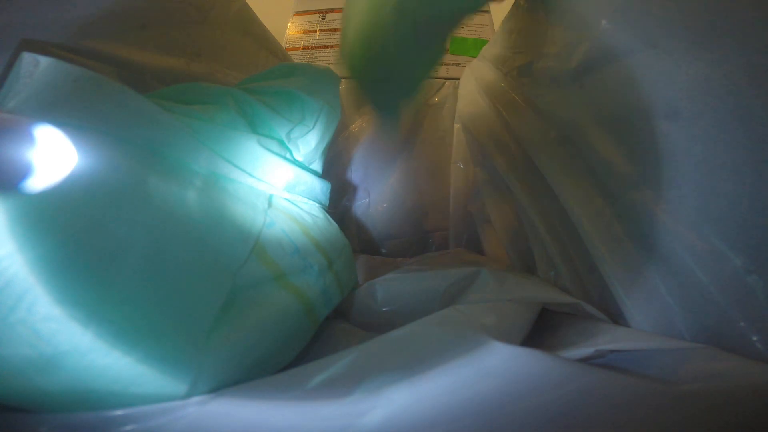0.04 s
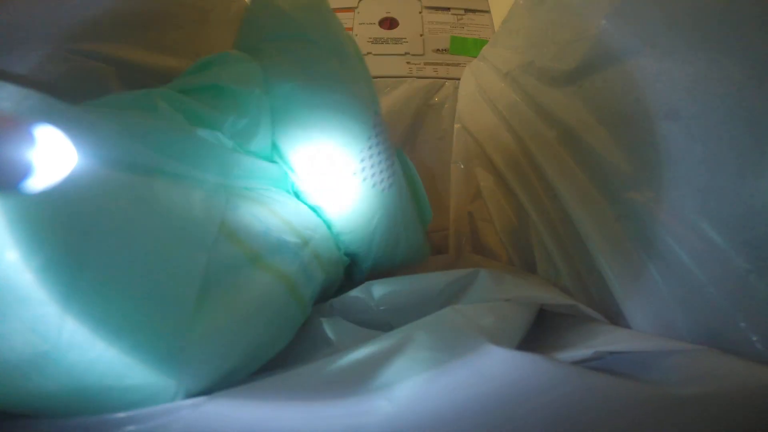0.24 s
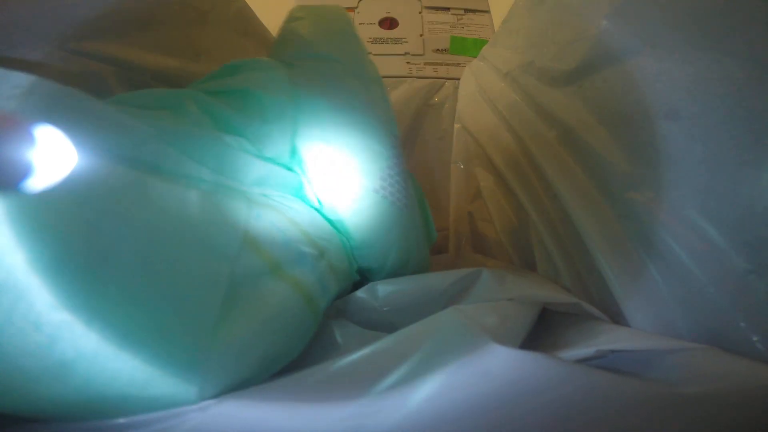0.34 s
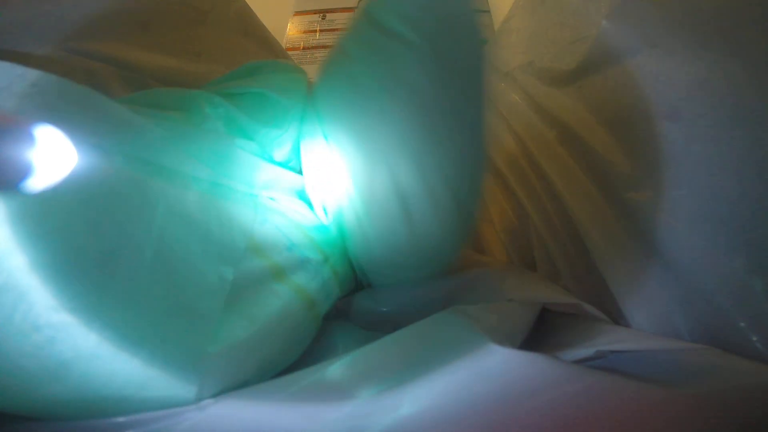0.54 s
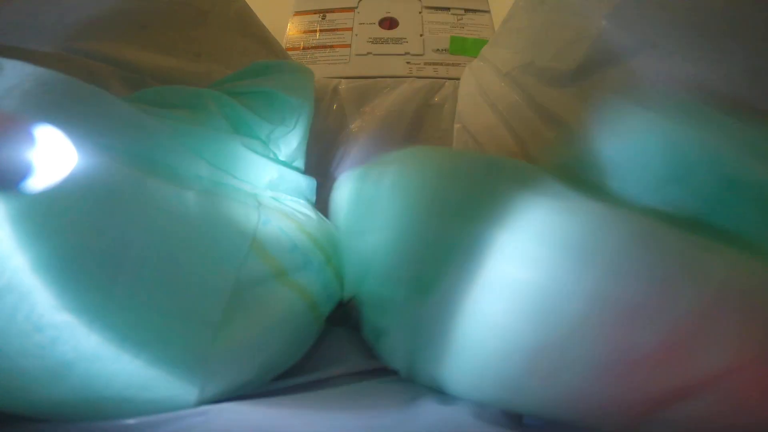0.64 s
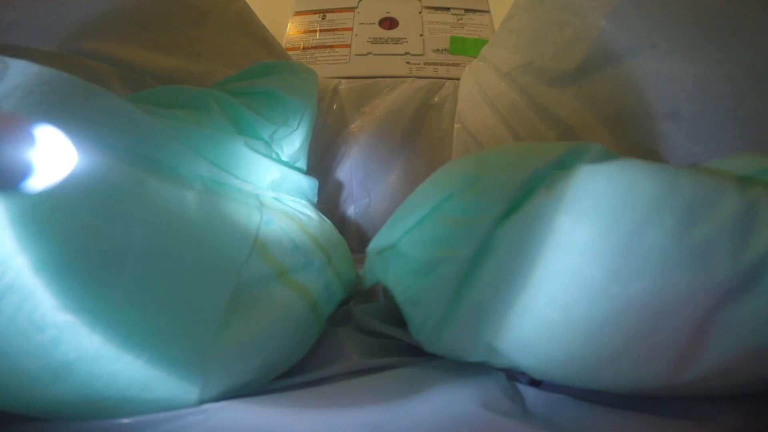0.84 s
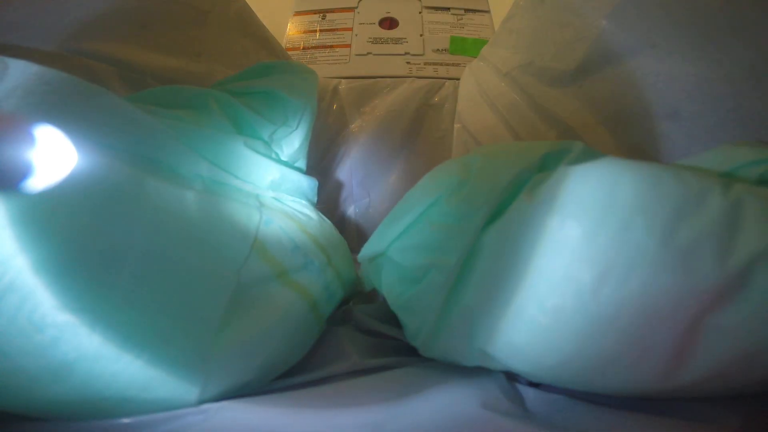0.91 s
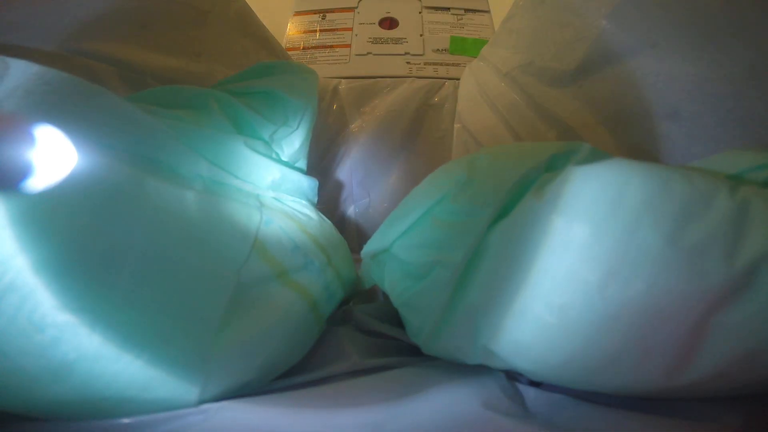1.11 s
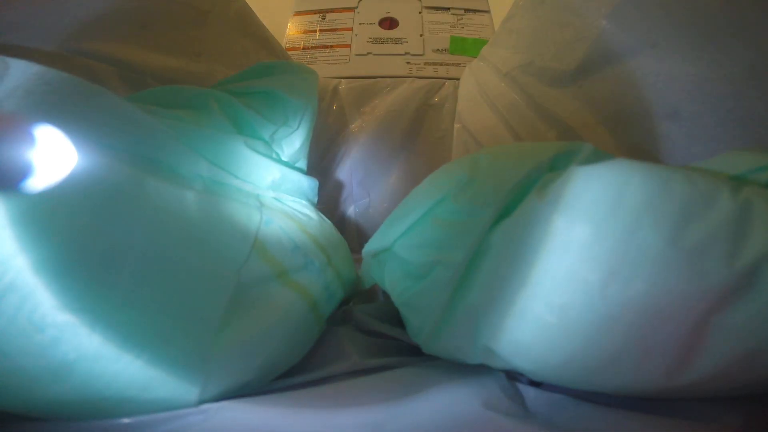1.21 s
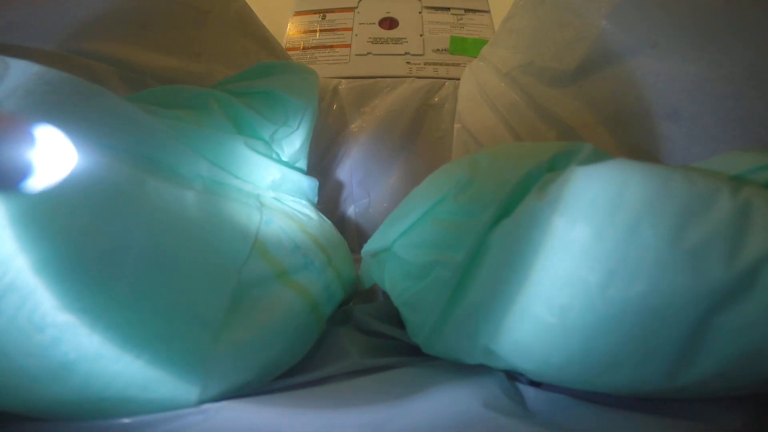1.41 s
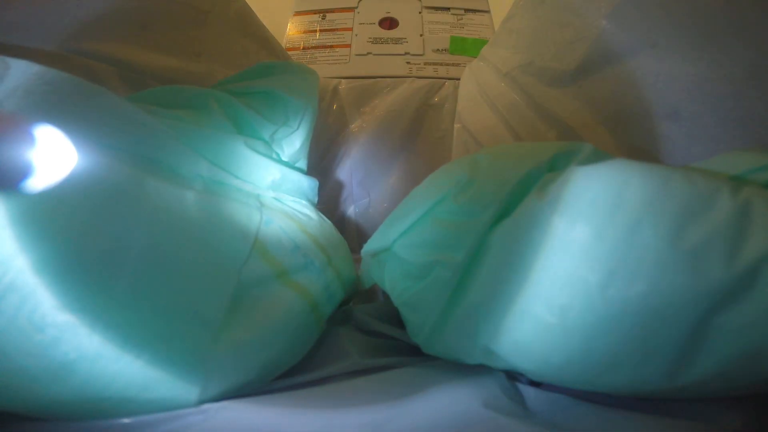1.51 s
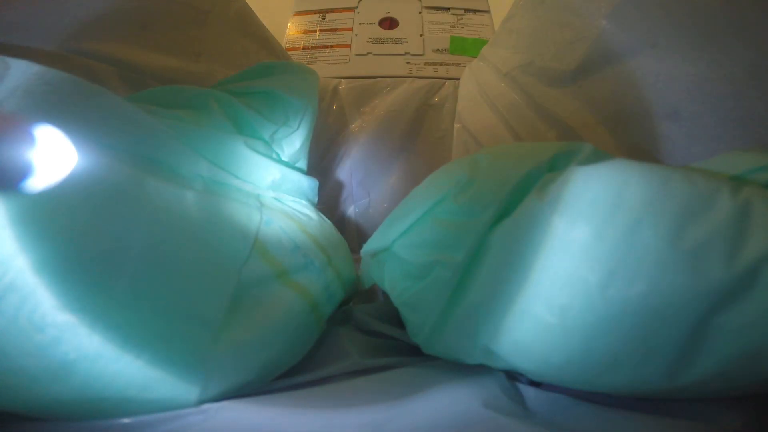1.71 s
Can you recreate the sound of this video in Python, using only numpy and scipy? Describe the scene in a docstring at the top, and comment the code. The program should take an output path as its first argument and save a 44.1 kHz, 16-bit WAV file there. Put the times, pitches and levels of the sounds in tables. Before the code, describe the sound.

A soft bundle thumps into a plastic-lined bin, heard from inside. After a faint brush of plastic, it lands at about 0.25 seconds with a deep, hollow boom and a crinkle, knocking again at 0.35. Smaller bumps follow as the boom fades. From 0.7 to 0.9 seconds it rubs quietly down the wall, rustling the liner. A faint low hum and hiss linger until about 1.75 seconds.

```python
"""First a faint brush of plastic, then a thump: a soft, tightly wrapped bundle drops into a lined bin,
heard from inside. It lands, tips over, rubs down the wall and settles. Each knock booms in the bin's
low modes, rings its hollow wall and crushes the liner, whose tiny buckles make the crinkle.
The bin wobbles under the load. A faint low hum lingers under the hiss."""
import sys
import numpy as np
from scipy import signal
from scipy.fft import rfft, irfft
from scipy.io import wavfile

SR = 44100
rng = np.random.default_rng(int(sys.argv[2]) if len(sys.argv) > 2 else 0)


def transcribe(u):
    """Save the signal u as a 16-bit wav file named by the first command-line argument.

    u: samples, shape (n,) or (channels, n), limited to [-1, 1]; the rate is SR.
    q: integer samples, one column per channel.
    """
    v = np.clip(np.atleast_2d(u).T, -1, 1)
    q = np.round(v * 32767).astype(np.int16)
    wavfile.write(sys.argv[1], SR, q)


N = 77175
T = np.arange(N) / SR

# partials of the low hum, before its swell: f/Hz, level/dB
HUM_PARTIALS = [(75.3, -44.5), (166.5, -44), (263, -60)]
# swell of the hum: t/s, gain/dB
HUM_ENVELOPE = [(0, -22), (.6, 5), (1.0, 3), (1.25, -3), (1.55, -6.5), (1.75, -11)]
# thin whine of electronics: f/Hz, level/dB
WHINE_PARTIALS = [(8781, -76.5), (11718, -82), (14625, -83.5)]
# tone of the air: f/Hz, gain/dB
AIR_EQ = [(25, 3), (70, 0), (140, -0.5), (200, -11), (280, -9.5), (420, -15), (900, -18.5), (2500, -32),
          (4500, -30.5), (5500, -34.5), (5900, -25), (6400, -36.5), (8000, -37), (15000, -43.5)]

# the falling bundle drags the liner: t/s, level/dB
BRUSH_ENVELOPE = [(.025, -74), (.043, -52), (.07, -54), (.15, -81.5), (.206, -70), (.211, -34),
                  (.217, -25.5), (.228, -33.5), (.245, -32.5), (.258, -34), (.28, -54.5), (.31, -65)]
# tone of that drag: f/Hz, gain/dB
BRUSH_EQ = [(300, 3.5), (900, -3.5), (1900, 5), (3900, -3), (4600, -10), (6300, -13), (9000, -23),
            (15000, -44.5)]
# the liner rustles as the bundle settles: t/s, level/dB
SETTLE_ENVELOPE = [(.33, -63), (.38, -62), (.48, -70), (.59, -63), (.65, -53), (.69, -57.5), (.742, -45.5),
                   (.785, -55.5), (.81, -53.5), (.855, -54), (.91, -69.5), (1.45, -71), (1.62, -61.5),
                   (1.75, -69)]
# tone of that rustle: f/Hz, gain/dB
SETTLE_EQ = [(400, 4.5), (700, 2.5), (1100, 0), (1800, 4.5), (3000, 0.5), (5000, -10), (6500, -7.5),
             (8000, -24), (15000, -38.5)]
# single creases snap: t/s, level/dB
SNAP_CUES = [(0.0508, -46.5), (0.1226, -42), (0.2141, -30.5), (0.247, -28.5), (0.338, -31.5),
             (0.375, -52.5), (0.427, -47.5), (0.517, -50), (0.651, -52), (0.683, -46), (0.711, -42),
             (0.7366, -33), (0.746, -51), (0.806, -46.5), (0.82, -50)]
# tone of the snaps: f/Hz, gain/dB
SNAP_EQ = [(500, -10.5), (1800, 2.5), (3000, 8), (4800, -2), (6500, -1), (8000, -12.5), (10000, -11),
           (15000, -27)]

# the bundle rubs along the wall: t/s, level/dB
RUB_ENVELOPE = [(.5, -66), (.63, -60.5), (.70, -48), (.75, -41.5), (.80, -53.5), (.885, -46.5),
                (.94, -66.5), (1.1, -69.5)]
# hollow bands the rub stirs: f/Hz, width/Hz, gain/dB
RUB_BANDS = [(254, 37, -1), (427, 43, -3.5), (516, 56, -5.5), (770, 100, -12)]
# the bin wobbles on its base: t/s, level/dB
WOBBLE_ENVELOPE = [(0, -62), (.10, -37), (.20, -50), (.228, -23.5), (.25, -6.5), (.31, -12), (.35, -19),
                   (.45, -22.5), (.50, -18), (.60, -28), (.76, -31), (.84, -32), (.90, -28.5), (1.0, -30.5),
                   (1.055, -43), (1.5, -46), (1.75, -78)]

# the bundle knocks the bin: t/s, boom/dB, slap/dB, slap t60/s, contact low-pass/Hz, wall ring/dB
KNOCK_CUES = [(.048, -39, -50.5, 0.031, 3000, -40.5), (0.1273, -47, -43, 0.026, 2800, -36),
              (0.2151, -24, -28.5, 0.18, 4000, -26), (0.249, -10.5, -14, 0.02, 2850, -0.5),
              (0.2541, -17.5, -17, 0.054, 2170, -11.5), (0.3226, -34, -25, 0.05, 2300, -14),
              (0.3404, -11, -20, 0.045, 2205, -7.5), (0.3451, -21.5, -25.5, 0.058, 1700, -15),
              (0.3532, -31.5, -36, 0.068, 2000, -17), (0.3785, -25.5, -36.5, 0.084, 2330, -26.5),
              (.430, -26.5, -36, 0.1, 2200, -29), (0.4689, -35, -47, .05, 1100, -34),
              (.7366, -45, -55, 0.046, 1900, -40.5), (.809, -37.5, -51.5, 0.065, 2800, -39)]
# tone of the crushed film: f/Hz, gain/dB
SLAP_EQ = [(150, -2), (400, 4.5), (900, 3.5), (1700, 1), (2700, -1), (4000, -15), (7000, -21.5),
           (15000, -25)]
# short, hollow modes of the wall: f/Hz, gain/dB, t60/s
WALL_MODES = [(682, -19, 0.13), (779, -15, 0.083), (996.5, -14.5, 0.06), (1123, -27, 0.075),
              (1273, -19, 0.046), (1502, -18.5, 0.064), (1740, -23.5, 0.051), (2175, -31.5, 0.054),
              (2412, -14.5, 0.049), (2624, -23, 0.04), (3340, -33.5, .042), (4093, -24.5, 0.037)]
# low modes of the bin: f/Hz, gain/dB, t60/s
BOOM_MODES = [(106.9, -11.5, 1.61), (134, -4.5, 1.27), (144.27, -3, 0.67), (173.92, -2.5, 0.98),
              (236.2, -15, .37), (261.3, -19, 1.09), (274.8, -1.5, 0.2), (319, -12, 0.26),
              (424.6, -7, 0.12), (454.6, -17.5, 0.41), (520, -11, 0.37), (559, -25.5, 0.19)]
# tone of the room's rumble after a knock: f/Hz, gain/dB
RUMBLE_EQ = [(50, 7.5), (80, -2), (105, 6), (160, 2.5), (210, 1), (290, 0.5), (355, -12.5), (410, -7),
             (550, -13.5), (800, -29), (1500, -32), (5000, -71.5)]


def from_db(db):
    """Decibels to gain."""
    return 10 ** (np.asarray(db) / 20)


def unit_power(x):
    """Scale to an RMS of one."""
    return x / np.sqrt(np.mean(x ** 2) + 1e-20)


def fader(envelope):
    """Gain ridden through (t/s, level/dB) points."""
    return from_db(np.interp(T, *np.transpose(envelope)))


def equalise(x, eq):
    """Apply an EQ curve, rolled off below its first point; unit power out."""
    hz, db = np.transpose(eq)
    f = np.fft.rfftfreq(N, 1 / SR) + 1e-3
    gain = from_db(np.interp(np.log(f), np.log(hz), db)) * np.minimum(f / hz[0], 1) ** 2
    return unit_power(irfft(rfft(x) * gain, N))


def lowpass(x, hz):
    """Two-pole low-pass."""
    return signal.sosfilt(signal.butter(2, hz, fs=SR, output="sos"), x + 1e-18)


def bandpass(x, hz, width):
    """A resonant band with unit gain at its centre."""
    r, w = np.exp(-np.pi * width / SR), 2 * np.pi * hz / SR
    return signal.lfilter(np.array([1, 0, -1]) * (1 - r * r) / 2, [1, -2 * r * np.cos(w), r * r], x + 1e-18)


def ring(x, hz, t60):
    """One mode: a unit click rings a dying sine of height 1."""
    r, w = np.exp(-np.log(1000) / (t60 * SR)), 2 * np.pi * hz / SR
    return signal.lfilter([0, np.sin(w)], [1, -2 * r * np.cos(w), r * r], x + 1e-18)


def burst(start, attack_s, t60_s):
    """Short attack, exponential decay."""
    age = T - start
    return np.clip(age / attack_s, 0, 1) * np.exp(-np.log(1000) * np.maximum(age - attack_s, 0) / t60_s)


def waver():
    """Random modulation, mostly below 20 Hz; unit power."""
    return unit_power(lowpass(rng.standard_normal(N), 20))


def background():
    """The bed: a wavering low hum, a thin electronic whine and faint air."""
    waver_db, air_db = 3, -52
    hum = sum(from_db(db + waver_db * waver()) * np.sin(2 * np.pi * hz * T) for hz, db in HUM_PARTIALS)
    whine = sum(from_db(db) * np.sin(2 * np.pi * hz * T) for hz, db in WHINE_PARTIALS)
    air = from_db(air_db) * equalise(rng.standard_normal(N), AIR_EQ)
    return fader(HUM_ENVELOPE) * hum + whine + air


def crinkles(per_s, spread_db=2.5):
    """Plastic film buckles in tiny clicks of uneven size."""
    sizes = from_db(spread_db * np.minimum(rng.exponential(1, N), 5))
    return sizes * rng.choice([-1, 1], N) * (rng.random(N) < per_s / SR)


def liner():
    """The liner crinkles as it is dragged and settles; single creases snap and echo in the bin."""
    brush = fader(BRUSH_ENVELOPE) * equalise(crinkles(per_s=12000), BRUSH_EQ)
    settle = fader(SETTLE_ENVELOPE) * equalise(crinkles(per_s=1500), SETTLE_EQ)
    attack_s, echo_db = 0.00064, -27
    snaps = sum(from_db(db) * burst(t, attack_s, t60_s=0.018) for t, db in SNAP_CUES)
    echoes = sum(from_db(db + echo_db) * burst(t, attack_s, t60_s=0.08) for t, db in SNAP_CUES)
    return brush + settle + (snaps + echoes) * equalise(rng.standard_normal(N), SNAP_EQ)


def wall_rub():
    """The toppling bundle slides down the wall, which answers with hollow bands and a wavering note."""
    note_hz, wander_hz, hollow_db = 402, 8.6, -3.5
    friction = rng.standard_normal(N)
    hollow = sum(from_db(db) * bandpass(bandpass(friction, hz, width), hz, 3 * width)
                 for hz, width, db in RUB_BANDS)
    pitch = note_hz + wander_hz * waver()
    note = np.sin(2 * np.pi * np.cumsum(pitch) / SR)
    return fader(RUB_ENVELOPE) * (from_db(hollow_db) * unit_power(hollow) + note)


def liner_slaps():
    """The crunch on each knock: film is crushed between bundle and wall."""
    crush = equalise(crinkles(per_s=12000), SLAP_EQ)
    return sum(from_db(db) * burst(t, attack_s=0.001, t60_s=t60) * lowpass(crush, hz)
               for t, _, db, t60, hz, _ in KNOCK_CUES)


def wall_ring(spread_db=1):
    """Each knock rings the wall's short, hollow modes in a slightly different mix."""
    taps = np.array([from_db(db) * lowpass(signal.unit_impulse(N, int(t * SR)), hz)
                     for t, *_, hz, db in KNOCK_CUES])
    strengths = from_db(spread_db * rng.standard_normal((len(KNOCK_CUES), len(WALL_MODES))))
    return sum((-1) ** k * from_db(db) * ring(strengths[:, k] @ taps, hz, t60)
               for k, (hz, db, t60) in enumerate(WALL_MODES))


def bin_wobble(hz=36.7):
    """The sub layer: the whole bin shakes under the load."""
    return fader(WOBBLE_ENVELOPE) * np.sin(2 * np.pi * hz * T)


def bin_boom(softness_hz=970, rumble_db=-14.5):
    """The thump: each knock pushes softly into the bin's low modes and leaves a diffuse room rumble."""
    hits = np.zeros(N)
    for t, db, *_ in KNOCK_CUES:
        hits[int(t * SR)] += from_db(db)
    pushes = lowpass(hits, softness_hz)
    body = sum((-1) ** k * from_db(db) * ring(pushes, hz, t60)   # modes alternate in polarity
               for k, (hz, db, t60) in enumerate(BOOM_MODES))
    tail_power = sum((from_db(db + rumble_db) * burst(t, attack_s=0.0034, t60_s=0.86)) ** 2
                     for t, db, *_ in KNOCK_CUES)
    return body + np.sqrt(tail_power) * equalise(rng.standard_normal(N), RUMBLE_EQ)


def scene():
    """The mono mix, heard from inside the bin."""
    impact = bin_boom() + bin_wobble() + wall_ring() + liner_slaps()
    return (impact + wall_rub() + liner() + background())[None]


def record(dry):
    """Trim the deepest bass, soft-clip the peaks and cut the very top."""
    low_cut_hz, high_cut_hz = 16, 14900
    trimmed = signal.sosfilt(signal.butter(2, low_cut_hz, "high", fs=SR, output="sos"), dry)
    rounded = trimmed / (1 + trimmed ** 6) ** (1 / 6)
    return signal.sosfilt(signal.ellip(10, .1, 90, high_cut_hz, fs=SR, output="sos"), rounded)


dry = scene()
out = record(dry)
transcribe(out)
```